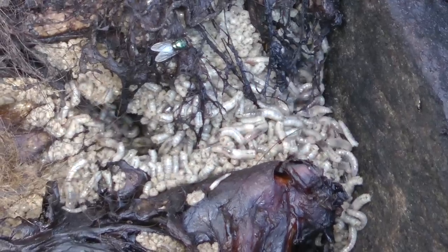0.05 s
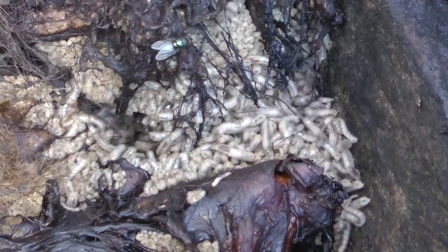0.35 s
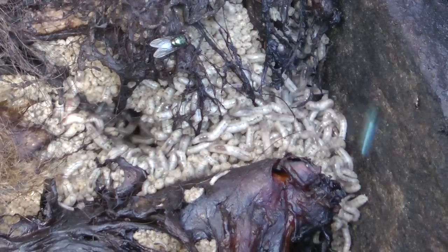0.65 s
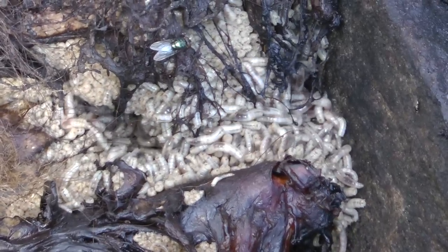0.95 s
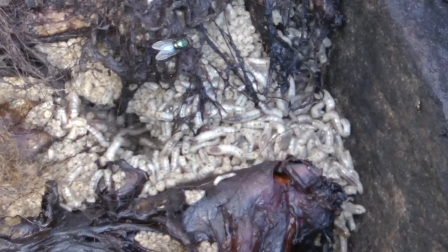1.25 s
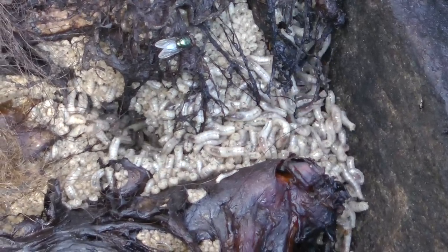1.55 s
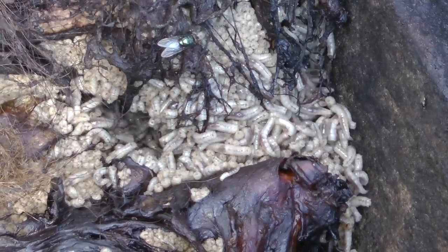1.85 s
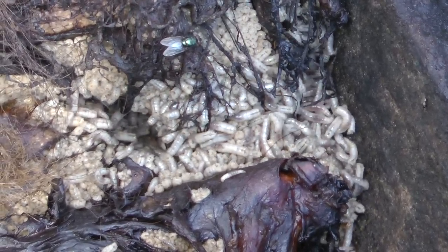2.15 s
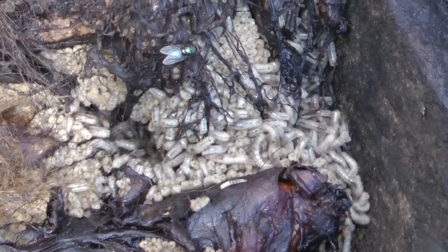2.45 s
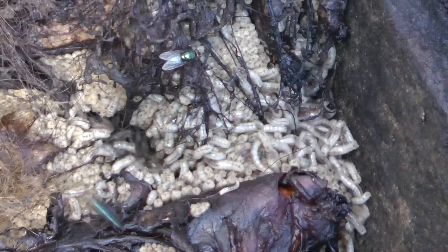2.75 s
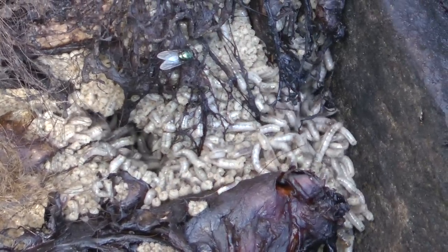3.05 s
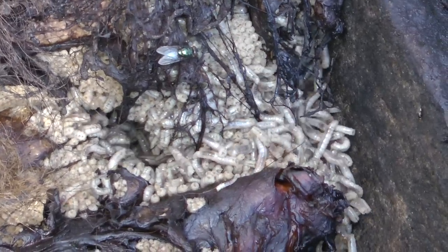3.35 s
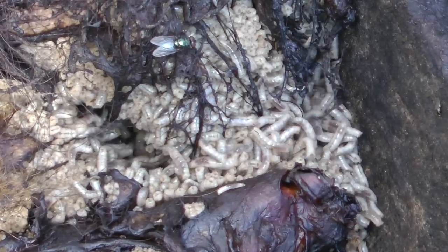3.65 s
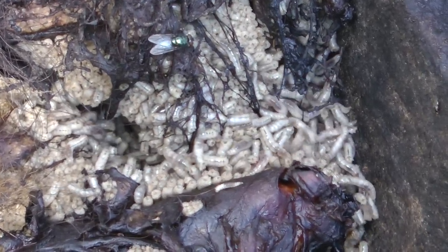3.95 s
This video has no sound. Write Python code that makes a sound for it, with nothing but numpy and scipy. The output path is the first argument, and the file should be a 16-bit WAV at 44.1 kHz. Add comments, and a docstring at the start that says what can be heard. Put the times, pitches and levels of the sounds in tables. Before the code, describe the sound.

Gusty wind buffets the microphone outdoors, over a faint wet fizz of maggots.

```python
"""Maggots in gusty wind

Outdoors, a camera microphone is held close to a carcass, and gusts buffet its two ports.
A mass of maggots seethes in front of it: tiny wet contacts merge into a steady fizz, with a few
single ticks. Faint open-air noise lies under both; the microphone cuts narrow dips into the midrange."""
import sys
import numpy as np
from scipy.fft import rfft, irfft, next_fast_len
from scipy.io import wavfile
from scipy.ndimage import map_coordinates

SR = 44100
rng = np.random.default_rng(int(sys.argv[2]) if len(sys.argv) > 2 else 0)


def wrap_up_sound(samples):
    """Save the sound to the file named by the first command line argument, as 16-bit audio."""
    columns = np.atleast_2d(samples).T
    # keep every value between -1 and 1, then stretch to whole-number steps
    tamed = np.clip(columns, -1, 1)
    steps = np.round(tamed * 32767).astype(np.int16)
    wavfile.write(sys.argv[1], SR, steps)


N = 176400


def amp(db):
    """Decibels to gain."""
    return 10 ** (np.asarray(db) / 20)


def unit(x):
    """x scaled to rms 1."""
    return x / np.sqrt(np.mean(x ** 2) + 1e-20)


def along(points, hz):
    """(Hz, value) points read at hz on a log axis."""
    f, v = np.transpose(points)
    return np.interp(np.log(hz + 1), np.log(f + 1), v)


def curve(rows):
    """(seconds, value) rows as one value per sample."""
    return np.interp(np.arange(N) / SR, *np.transpose(rows))


def wobble(per_s):
    """A smooth random curve with per_s knots a second."""
    return map_coordinates(rng.standard_normal(size=2048), [np.arange(N) * per_s / SR], mode='wrap')


def filtered(x, response):
    """x through a gain given as a function of frequency."""
    size = next_fast_len(N + SR // 2)
    return irfft(rfft(x, size) * response(np.fft.rfftfreq(size, 1 / SR)), size)[..., :N]


def spread(pair, mid_db, side_db):
    """Two unrelated signals coloured as mid and side, returned as left and right of joint rms 1."""
    mid, side = filtered(pair, lambda hz: amp(np.array([mid_db(hz), side_db(hz)])))
    return unit(np.array([mid + side, mid - side]))


def field(pair, spectrum, width):
    """A nearly central sound with the given spectrum; width is its side level against the mid."""
    return spread(pair, lambda hz: along(spectrum, hz), lambda hz: along(spectrum, hz) + along(width, hz))


# The open air, far beyond the carcass. Each row: frequency in Hz, relative level in dB.
AIR_SPECTRUM = [(20, -0.5), (60, 9.5), (120, 3), (200, 0), (350, -5), (600, 1.5), (800, -1.5), (1000, -8.5),
                (1400, -6.5), (1900, -7.5), (2800, -13), (5000, -25), (10000, -33), (16000, -32)]
# Its stereo width. Each row: frequency in Hz, side level against the mid in dB.
AIR_WIDTH = [(50, -13), (120, -17), (300, -26), (1000, -12), (2000, -9.5), (5000, -20.5), (15000, -31)]


def open_air():
    """The faint noise of the landscape, wavering and slowly easing."""
    midway_db, fade_db_per_s, waver_db = -53.5, 0.4, 0.54
    from_midway_s = (np.arange(N) - N / 2) / SR
    level_db = midway_db - fade_db_per_s * from_midway_s + waver_db * wobble(per_s=6.1)
    return amp(level_db) * field(rng.standard_normal((2, N)), AIR_SPECTRUM, AIR_WIDTH)


# The maggots, close in front of the microphone. Each row: frequency in Hz, relative level in dB.
FIZZ_SPECTRUM = [(800, -34), (1800, -1.5), (3000, 0), (4200, 2), (5500, 0), (6800, -2.5), (8200, -9.5),
                 (9300, -11.5), (10500, -16), (13000, -17), (16000, -21)]
# The stereo width of the mass. Each row: frequency in Hz, side level against the mid in dB.
FIZZ_WIDTH = [(2000, -11), (6000, -19), (9000, -14), (15000, -57)]
# Its nearly steady seething. Each row: time in seconds, level of the fizz in dB.
SEETHING = [(0.0, -59.8), (0.45, -60.0), (0.75, -59.5), (1.4, -59.4), (1.65, -59.8), (2.3, -59.5),
            (2.8, -59.5), (3.3, -58.5), (3.5, -60.5), (3.8, -58.5), (4.0, -60)]


def maggots():
    """Countless tiny wet contacts merge into a fizz; the nearer ones stand out as crackle."""
    contacts_per_s, crackle_db, stir_db = 1400, -4, 0.38
    spread_db, nearest_db = 4, 10.5  # above the farthest contact
    fizz = field(rng.standard_normal((2, N)), FIZZ_SPECTRUM, FIZZ_WIDTH)
    sizes = amp(np.minimum(spread_db * rng.exponential(size=(2, N)), nearest_db))
    contacts = rng.random((2, N)) < contacts_per_s / SR
    polarity = np.sign(rng.standard_normal((2, N)))
    crackle = field(contacts * sizes * polarity, FIZZ_SPECTRUM, FIZZ_WIDTH)
    level_db = curve(SEETHING) + stir_db * wobble(per_s=18)
    return amp(level_db) * (fizz + amp(crackle_db) * crackle)


# Single ticks from the carcass, close and central. Each row: start in seconds, level in dB,
# pitch in Hz, bandwidth in octaves, time to fall 60 dB in seconds.
WET_TICKS = [(0.3928, -46, 6450, .15, 0.012), (.848, -52, 7300, .08, .016),
             (2.905, -39.5, 3600, 0.85, 0.0065), (3.3306, -35.5, 6860, 0.49, 0.0045),
             (3.357, -39, 4200, 0.23, 0.0062), (3.752, -47, 4500, .4, .006), (3.8465, -50, 2900, .4, .004)]


def wet_ticks():
    """A wet film snaps: a burst of noise around its own pitch that dies within milliseconds."""
    out = np.zeros(N + SR)
    t = np.arange(SR // 10) / SR
    rise = 1 - np.exp(-t / .00015)
    for start, level_db, hz, octaves, t60 in WET_TICKS:
        band = lambda f: np.exp(-.5 * (np.log2((f + 1) / hz) / octaves) ** 2)
        snap = unit(filtered(rng.standard_normal(N), band))[:len(t)]
        envelope = rise * amp(level_db - 60 * t / t60)
        out[round(start * SR):][:len(t)] += envelope * snap
    return out[:N]


# Gusts right on the microphone, with one short lull. Each row: time in seconds, strength in dB.
GUSTS = [(0.0, -34.5), (0.16, -44.5), (0.19, -39), (0.34, -46.5), (0.39, -42.5), (0.43, -49.5), (0.49, -41),
         (0.63, -43.5), (0.67, -32), (0.69, -33.5), (0.78, -37.5), (0.84, -33), (1.0, -43), (1.24, -39),
         (1.33, -46.5), (1.36, -39.5), (1.42, -64), (1.57, -64), (1.63, -47.5), (1.71, -49), (1.78, -38),
         (1.83, -50), (1.98, -33.5), (2.04, -50), (2.09, -44.5), (2.13, -33.5), (2.2, -32.0), (2.24, -46.5),
         (2.32, -38), (2.44, -45.0), (2.51, -38.5), (2.6, -51.5), (2.74, -39.5), (2.83, -32.5),
         (2.95, -49.5), (2.99, -37.5), (3.16, -37.5), (3.19, -61), (3.22, -38.5), (3.32, -33.5),
         (3.42, -27.5), (3.56, -33.5), (3.59, -29), (3.7, -36.0), (3.73, -31.5), (3.8, -41), (3.83, -28.5),
         (3.89, -43.5), (3.95, -30), (4.0, -36)]
# Buffeting common to both ports. Each row: frequency in Hz, relative level in dB.
BUFFET_COMMON = [(20, -24), (35, -17.5), (60, -6), (120, -0.5), (180, 1), (300, -2), (400, -9.5),
                 (550, -18.5), (750, -28), (1000, -35), (2000, -57.5), (5000, -75)]
# Buffeting opposed between the ports. Each row: frequency in Hz, relative level in dB.
BUFFET_OPPOSED = [(20, -23), (45, -20), (70, -12), (110, -2), (200, -3), (360, -3.5), (550, -13.5),
                  (750, -18), (1000, -29), (1800, -40.5), (3000, -50.5), (6000, -88)]


def wind():
    """Eddies thump on the ports; a stronger gust is louder and a little brighter."""
    flutter_db, trim_db = 2, .5
    corner_hz, brighten = 444, 0.25  # above the corner: extra dB per dB of wind
    flutter = amp(flutter_db * np.array([wobble(per_s=70), wobble(per_s=70)]))
    eddies = flutter * rng.standard_normal((2, N))
    buffet = spread(eddies, lambda hz: along(BUFFET_COMMON, hz), lambda hz: along(BUFFET_OPPOSED, hz))
    low = filtered(buffet, lambda hz: 1 / (1 + (hz / corner_hz) ** 4))
    high = buffet - low
    strength_db = curve(GUSTS)
    gust_db = strength_db - np.percentile(strength_db, 80)
    return amp(strength_db + trim_db) * (low + amp(brighten * gust_db) * high)


def scene():
    """Open air in the distance, maggots close up, wind on the microphone itself."""
    return open_air() + maggots() + wet_ticks() + wind()


# The microphone's narrow midrange dips. Each row: centre in Hz, width in Hz, depth in dB.
MIC_DIPS = [(498, 24, 5), (643, 25.6, 5.5), (893, 61, 4.5), (1299, 48, 6), (1555, 41, 8)]
# Its two ports differ slightly. Each row: frequency in Hz, left minus right in dB.
PORT_BALANCE = [(60, 5), (110, -0.5), (200, -1.5), (380, -0.5), (700, -0.5), (1290, -3.5), (2380, -1.5),
                (4400, 0.5), (8120, 0.5), (15000, -0.5)]


def record(dry):
    """The camera microphone: narrow dips, unequal ports and a band limit."""
    top_hz = 16400
    dips_db = lambda f: sum(depth * np.exp(-.5 * ((f - hz) / width) ** 2) for hz, width, depth in MIC_DIPS)
    lean_db = lambda f: np.outer([.5, -.5], along(PORT_BALANCE, f))
    return filtered(dry, lambda f: amp(lean_db(f) - dips_db(f)) * (f < top_hz))


dry = scene()
out = record(dry)
wrap_up_sound(out)
```